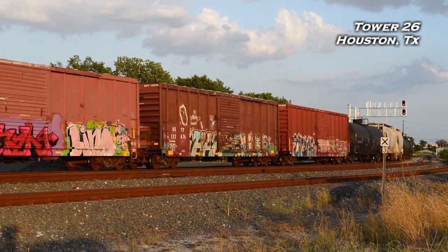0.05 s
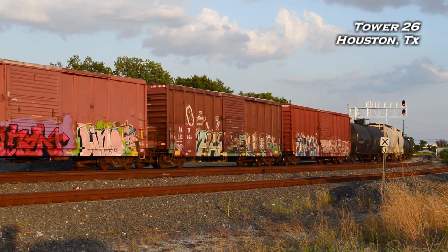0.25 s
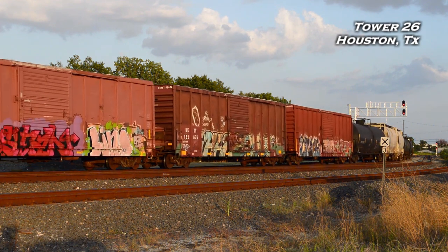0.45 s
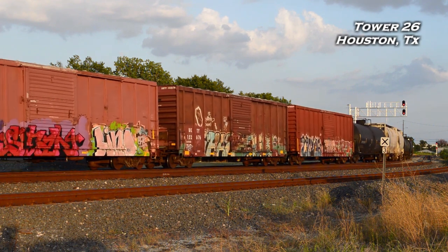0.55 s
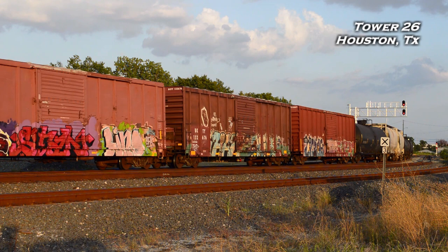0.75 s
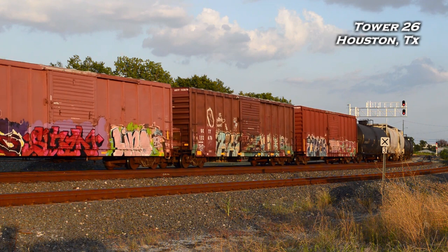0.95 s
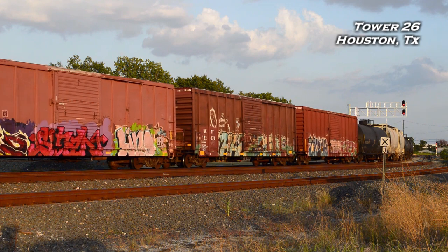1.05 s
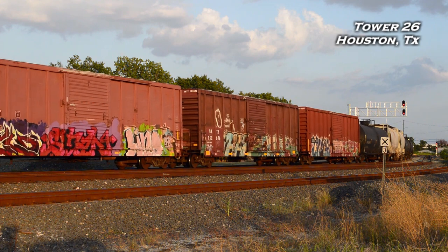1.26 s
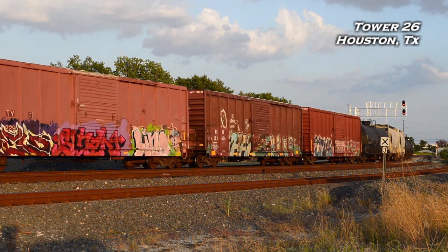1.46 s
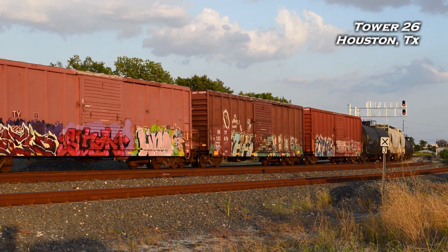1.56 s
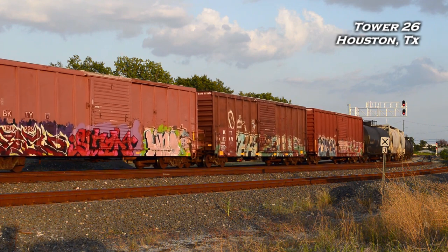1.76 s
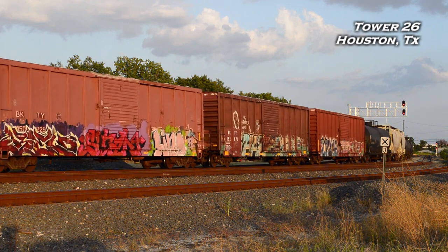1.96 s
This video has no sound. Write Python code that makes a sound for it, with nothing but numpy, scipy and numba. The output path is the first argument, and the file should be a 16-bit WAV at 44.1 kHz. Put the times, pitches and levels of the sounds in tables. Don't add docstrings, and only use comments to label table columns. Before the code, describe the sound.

Loud, piercing wheel squeal from a slow freight train, ringing out over low rolling rumble

```python
import sys
import numpy as np
from scipy import signal
from scipy.io import wavfile
from scipy.ndimage import map_coordinates
from numba import njit

SR = 44100
rng = np.random.default_rng(int(sys.argv[2]) if len(sys.argv) > 2 else 0)


def master(y):
    cut = np.clip(np.atleast_2d(y).T, -1, 1)
    pcm = np.round(cut * 32767)
    wavfile.write(sys.argv[1], SR, pcm.astype(np.int16))


def ratio(d):
    e = np.asarray(d, float) / 20
    return 10 ** e


N = 88200
T = np.arange(N) / SR

DAMPED_HZ = [968, 3865, 3887, 3950, 4193, 5811, 6775, 7681, 7724, 8616, 11256, 3435, 4855, 5000]
# scrape-driven level in dB, t60 after release in seconds, jolt level change in dB.
DAMPED = [(-55, .2, 0), (-33, 0.094, 0), (-39.5, 0.18, 0), (-46, .15, 0), (-69, .2, 0), (-40, 0.18, 0),
          (-53, 0.39, 0), (-50, 0.16, 0), (-40.5, 0.12, 0), (-38, 1, 3), (-62, .3, 0), (-47, .2, 0),
          (-49.5, 0.9, 2), (-57, .3, 0)]
# peak in seconds, level in dB, half width in seconds.
DAMPED_SWELLS = [
    [(.68, -37.5, 0.029), (1.31, -42, 0.076)],
    [(.25, -24, 0.33), (.48, -20, 0.074), (.9, -47, 0.19), (1.25, -28, 0.25)],
    [(.62, -25, 0.03), (.72, -19, 0.038), (.93, -24, 0.03)],
    [(.45, -29, 0.071), (.61, -26.5, 0.1)],
    [(.24, -26.5, 0.019), (.87, -26, 0.035)],
    [(.52, -31.5, 0.1), (.77, -28.5, 0.089), (1.12, -41, 0.041), (1.3, -24.5, 0.19)],
    [(.3, -28, 0.12), (.45, -27, 0.045), (1.02, -51, 0.032), (1.25, -28, 0.085)],
    [(.28, -25.5, 0.075), (.48, -48, 0.082), (.7, -26.5, 0.13), (1.3, -48, 0.026)],
    [(.29, -19, 0.04), (.5, -14, 0.17), (.85, -24, 0.25), (1.45, -29.5, 0.15)],
    [(.45, -32, 0.12), (.64, -25.5, 0.1), (.87, -42, 0.064), (1.37, -35, 0.071)],
    [(.34, -39.5, 0.11), (.92, -44, 0.15)],
    [(.43, -38, 0.061), (.57, -30, 0.024)],
    [(.39, -44, 0.027), (.63, -33, 0.086), (.95, -32, 0.081), (1.35, -55, .15)],
    [(.46, -39, 0.045), (.62, -31, 0.03), (.78, -34, 0.088)],
]
RINGING_HZ = [1934, 2860, 3157, 3818, 4158, 4788, 5358, 5758, 13450, 6722, 8653, 10560, 12715, 15090]
# scrape-driven level in dB, t60 after release in seconds, jolt level change in dB.
RINGING = [(-41.5, 1.96, -0.5), (-39.5, 1.38, -4), (-39, 1.2, -1), (-39, 3.1, -5), (-41.5, 3.4, -16),
           (-36.5, 1.06, -11.5), (-43.5, 1.1, 7), (-42, 1.3, -2), (-66, .6, -1), (-42, 12, -3),
           (-46.5, 1.08, 6), (-51.5, 0.99, 10), (-59, .9, -5), (-60, 1.1, -3)]
# peak in seconds, level in dB, half width in seconds.
RINGING_SWELLS = [
    [(.99, -28.5, 0.024), (1.08, -33, 0.08), (1.53, -28.5, 0.12)],
    [(.29, -35, 0.28), (1.2, -30, 0.11), (1.51, -31, 0.26)],
    [(.98, -40.5, 0.21), (1.45, -46, 0.058)],
    [(.3, -32, 0.11), (1.17, -23.5, 0.071), (1.55, -43.5, .1)],
    [(.58, -36, 0.057), (.76, -33, .06), (.95, -40, 0.11), (1.4, -50, 0.05), (1.56, -44.5, 0.068)],
    [(.25, -38, 0.034), (.55, -51, 0.06), (.41, -26, 0.035), (.69, -28.5, 0.072), (.82, -21, 0.07),
     (1.05, -18, 0.17), (1.24, -15.5, 0.14), (1.42, -12, 0.11)],
    [(1.49, -42, 0.08)],
    [(.43, -34.5, 0.076), (.62, -29, 0.04), (.8, -30.5, 0.074), (1.04, -21, 0.077), (1.3, -29.5, 0.11),
     (1.55, -33.5, .08)],
    [(1.25, -58, 0.2)],
    [(.42, -27.5, 0.17), (.53, -24, 0.054), (.72, -19, 0.1), (1.04, -16.5, 0.12), (1.46, -27, 0.12)],
    [(.67, -53, 0.091), (1.02, -24, 0.15), (1.42, -37, 0.14)],
    [(1.15, -73, .2), (1.5, -49, 0.072)],
    [(1.5, -57, .2)],
    [(.5, -63, .2), (1.45, -59, .3)],
]
# time in seconds, level in dB.
PRESSURE = [
    (.22, -42),
    (.3, -45.5),
    (.46, -39.5),
    (.87, -39.5),
    (1.2, -40.5),
    (1.44, -41.5),
    (1.53, -51),
    (1.6, -57),
]
# frequency in Hz, level in dB per Hz.
SCRAPE_COLOUR = [(500, -15), (1000, -10.5), (1700, -7.5), (2900, 3), (4500, -7), (7000, -2), (11000, -11.5),
                 (15500, -29)]
BOGIE_HZ = [1000, 2050, 2740, 2945, 3185, 3430, 5000, 5900, 7445, 9510, 10400, 10700, 12050, 6860]
# width in Hz, level in dB.
BOGIE = [(46, -52), (56.5, -41), (25, -56), (66, -36.5), (37.037, -64), (30.3, -47), (32.4, -38),
         (55.556, -36), (27.8, -66), (25, -44.5), (25, -46), (39, -46), (30, -60), (70, -44)]
# start in seconds, pitch in Hz.
KNOCK_AT = [(.0, 2600), (.09, 5200), (.11, 8360), (.222, 2170), (.27, 11600), (.63, 945), (.79, 1280),
            (.9, 1480), (1.44, 970), (1.809, 8500), (1.809, 11200), (1.811, 1340), (1.812, 14900),
            (1.812, 4000), (1.813, 2500), (1.815, 10000), (1.822, 3870), (1.89, 2600), (1.945, 9100),
            (.45, 2950), (.58, 2945), (.84, 2990), (1.02, 3170), (.665, 4340), (.88, 2040), (.46, 3280),
            (1.915, 2580), (1.42, 7550), (1.808, 5000), (1.53, 9600), (1.53, 11400), (.3, 7400)]
# level in dB, decay in seconds, width in Hz.
KNOCK_SHAPE = [(-48, 0.13, 200), (-45.5, 0.049, 580), (-53, 0.027, 200), (-31.5, 0.015, 120),
               (-38.5, 0.17, 620), (-42.5, 0.13, 50), (-40.5, 0.21, 59), (-33, 0.03, 27),
               (-36.5, 0.074, 28), (-50, .05, 2500), (-45, .012, 150), (-34, 0.033, 35), (-60, .04, 100),
               (-45, 0.044, 4000), (-33.5, 0.022, 170), (-48, .04, 80), (-37.5, 0.036, 110),
               (-43, 0.17, 990), (-41, 0.0078, 120), (-41, 0.03, 34), (-48, 0.041, 23), (-25, .06, 25),
               (-28, 0.07, 25), (-29, 0.048, 53), (-33, 0.047, 23), (-35, 0.026, 30), (-42.5, .05, 17),
               (-44, 0.17, 15), (-42, .004, 6000), (-52, .12, 900), (-56.5, .1, 900), (-28, 0.058, 120)]
# frequency in Hz, level in dB per Hz.
YARD_COLOUR = [(12, -41), (20, -25), (54, 1), (362, -25), (404, -23.5), (597, -26.5), (1380, -32),
               (5230, -37), (15500, -61.5)]

BITE_S, BITE_RISE_S, RELEASE_S, JOLT_S = 0.2165, 0.0034, 1.539, 1.825
BLOOM_S_PER_KHZ = 0.004
SAG_PER_S = .0008
STEADY_SHARE = 0.35
ECHO_DB, ECHO_T60_S = -31.5, 0.52
SPLIT_HZ, BEAT_DB, BEAT_HZ, BEAT_PEAK_S = 6722, 3, 5.4, 1.712
SCRAPE_DB, SCRAPE_TAIL_S = 6, 0.25
RAIL_DB, RAIL_T60_S, RAIL_SPREAD_DB = 2.5, 0.36, 2.5
YARD_DB, MIC_HISS_DB = -32.5, -65.5
GRIT = rng.standard_normal(N)


@njit
def svf(x, hz, width):
    y, b, l = np.empty(len(x)), 0., 0.
    g, k = np.tan(np.pi * hz / SR), width / hz
    for i in range(len(x)):
        v = (b + g * (x[i] - l)) / (1 + g * (g + k))
        b, l, y[i] = 2 * v - b, l + 2 * g * v, k * v
    return y


def unit(x):
    return x / np.sqrt(np.mean(np.abs(x) ** 2))


def walk(rate):
    knots = rng.standard_normal(400)
    return unit(map_coordinates(knots, [np.minimum(T * rate, 399)], order=3))


def rough_walk(rate):
    return walk(rate) + 1j * walk(rate)


def bands(colour, slow_db, flicker_db):
    hz, db = np.array(colour).T
    out, swell = 0, walk(3.34)
    for f in 22 * 2 ** np.arange(0, 9.5, 1 / 3):
        band = unit(svf(svf(rng.standard_normal(N), f, f / 3), f, f / 3))
        level = np.interp(np.log(f), np.log(hz), db) + slow_db * swell + flicker_db * walk(14.02)
        out = out + band * np.sqrt(f) * ratio(level)
    return unit(out)


def pressure():
    s, db = np.array(PRESSURE).T
    bite = 1 - np.exp(-np.maximum(T - BITE_S, 0) / BITE_RISE_S)
    tail = np.exp(-np.maximum(T - RELEASE_S, 0) / SCRAPE_TAIL_S)
    return ratio(np.interp(T, s, db)) * bite * tail


def wheel(pitches, modes, swells, grip, wobble_db, wobble_hz, grit_hz, skirt_db, twin_db):
    out = 0
    held = np.minimum(np.arange(N), int(RELEASE_S * SR))
    free = np.maximum(T - RELEASE_S, 0)
    jolt = np.clip((T - JOLT_S) / 0.025, 0, 1)
    beat = BEAT_DB * np.minimum(free / 0.038, 1) * np.cos(2 * np.pi * BEAT_HZ * (T - BEAT_PEAK_S))
    for hz, (db, t60, jolt_db), bumps in zip(pitches, modes, swells):
        bloom_s = BLOOM_S_PER_KHZ * hz / 1000
        bite = 1 - np.exp(-(np.maximum(T - BITE_S, 0) / bloom_s) ** 2)
        locked = np.sqrt(sum(ratio(d - 6.2 * ((T - s) / w) ** 2) ** 2 for s, d, w in bumps))
        locked = locked * ratio(wobble_db * walk(25.93)) * bite
        flutter = ratio(db) * grip * (STEADY_SHARE + rough_walk(grit_hz) / np.sqrt(2))
        drive = locked[held] + flutter * ratio(-40 * free)

        skirt = ratio(skirt_db - 5.2 * free) * rough_walk(150)
        twin_cycles = hz * rng.uniform(0.0018, .005) * T + 0.22 * walk(4.94)
        twin = ratio(twin_db) * min(hz / 7000, 1.2) ** 2 * np.exp(2j * np.pi * twin_cycles)

        shimmer_db = 0.32 + 1.5 * (hz / 12000) ** 3
        fade = -60 * free / t60 + shimmer_db * walk(24.03) + jolt_db * jolt
        fade = fade + (hz == SPLIT_HZ) * beat
        echo = ratio(ECHO_DB - 60 * free / ECHO_T60_S + 3.7 * walk(30.5))
        ring = drive * (ratio(fade) + echo) * (1 + skirt + twin)

        pitch = hz * (1 - SAG_PER_S * (T - 1))
        pitch = pitch + wobble_hz * hz / 5000 * walk(14) * (T < RELEASE_S)
        cycles = np.cumsum(pitch) / SR + rng.random()
        out = out + np.sqrt(2) * np.imag(ring * np.exp(2j * np.pi * cycles))
    return out


def scrape(press):
    return ratio(SCRAPE_DB) * press * bands(SCRAPE_COLOUR, slow_db=-3.7, flicker_db=4.2)


def bogie(grip):
    out = 0
    for hz, (width, db) in zip(BOGIE_HZ, BOGIE):
        tone = unit(svf(rng.standard_normal(N), 1. * hz, 1. * width))
        out = out + tone * ratio(db + 2.3 * walk(7.93))
    return out * grip


def rail(press, count):
    hz, db = np.array(SCRAPE_COLOUR).T
    jolt = ratio(-51.5) * np.exp(-np.maximum(T - 1.81, 0) / 0.041) * (T > 1.81)
    out, gain = 0, press + jolt
    for k, (place, size, ring) in enumerate(rng.random((count, 3))):
        f = 1300 + 14300 * (k + place) / count
        width = 4.2 / (RAIL_T60_S * (0.043 + 0.94 * ring ** 2))
        strength = ratio(np.interp(np.log(f), np.log(hz), db) + RAIL_SPREAD_DB * (2 * size - 1) * 2)
        grit = np.roll(GRIT, int(place * N))
        out = out + strength / np.sqrt(width) * svf(gain * grit, f, width)
    return ratio(RAIL_DB) * out * np.median(press) / np.median(np.abs(out))


def clanks():
    out = 0
    for (s, hz), (db, decay, width) in zip(KNOCK_AT, KNOCK_SHAPE):
        age = np.maximum(T - s, 0) / decay
        envelope = (1 - np.exp(-age * 20)) * np.exp(-age)
        out = out + ratio(db) * envelope * unit(svf(rng.standard_normal(N), 1. * hz, 1. * width))
    return out


def yard():
    air = ratio(YARD_DB) * bands(YARD_COLOUR, slow_db=0.3, flicker_db=2.0)
    return air + ratio(MIC_HISS_DB) * rng.standard_normal(N)


def scene():
    press = pressure()
    grip = press / np.median(press)
    damped = wheel(DAMPED_HZ, DAMPED, DAMPED_SWELLS, grip, wobble_db=0.0, wobble_hz=5.1,
                   grit_hz=40.08, skirt_db=-13, twin_db=-42)
    ringing = wheel(RINGING_HZ, RINGING, RINGING_SWELLS, grip, wobble_db=0.18, wobble_hz=2.41,
                    grit_hz=30.01, skirt_db=-16.5, twin_db=-14)
    contact = scrape(press) + bogie(grip) + rail(press, count=260)
    return (damped + ringing + contact + clanks() + yard())[None]


def band_limit(x):
    return signal.sosfilt(signal.butter(12, 15670, fs=SR, output="sos"), x)


def record(dry):
    soft = np.tanh(.5 * dry) / .5
    low_cut = signal.butter(2, 14, "high", fs=SR, output="sos")
    mix = signal.sosfilt(low_cut, soft)
    return band_limit(mix)


dry = scene()
out = record(dry)
master(out)
```